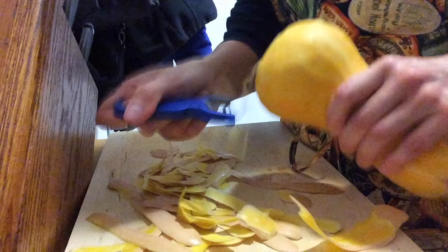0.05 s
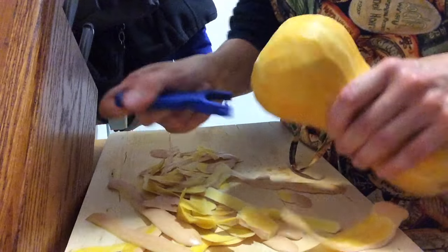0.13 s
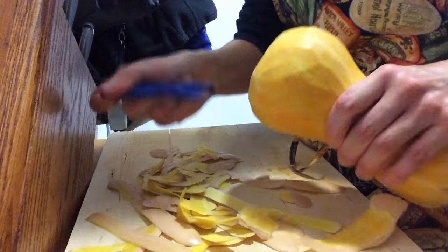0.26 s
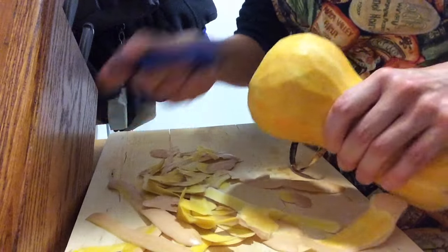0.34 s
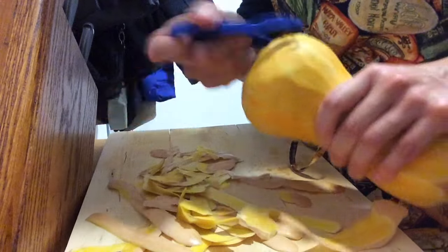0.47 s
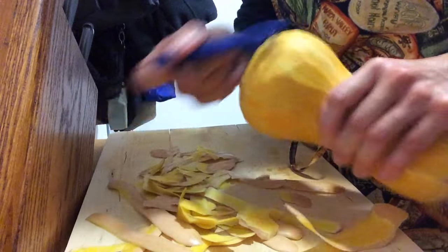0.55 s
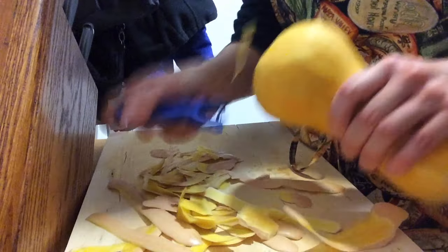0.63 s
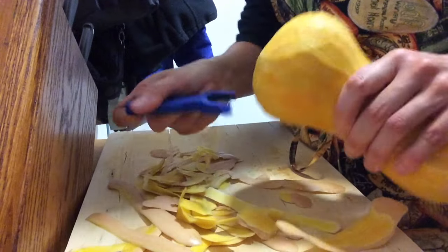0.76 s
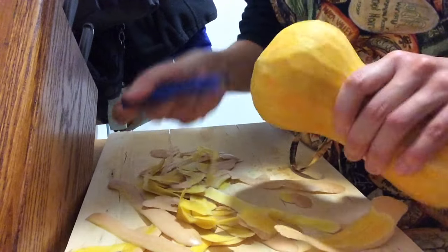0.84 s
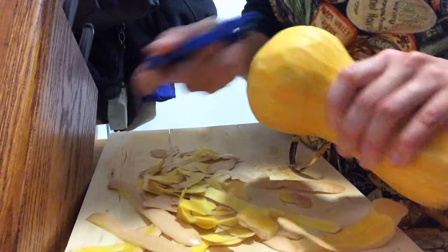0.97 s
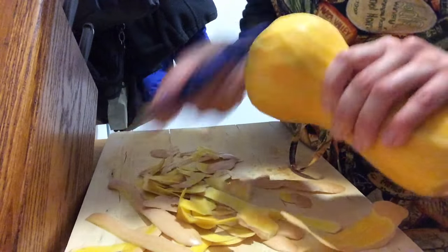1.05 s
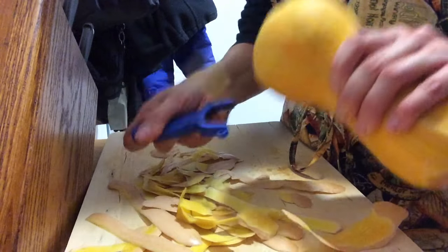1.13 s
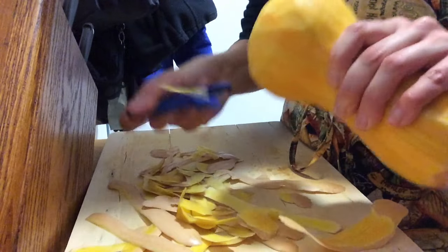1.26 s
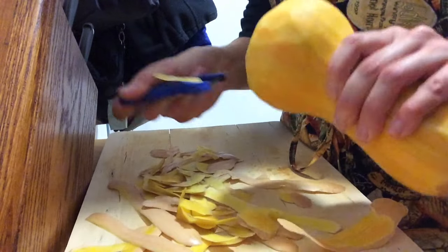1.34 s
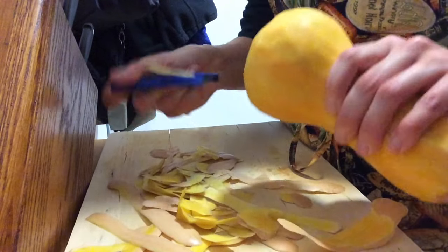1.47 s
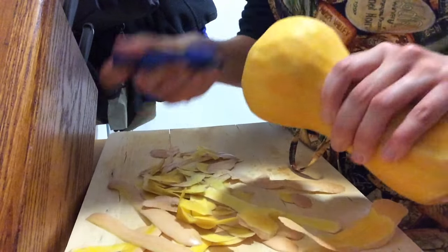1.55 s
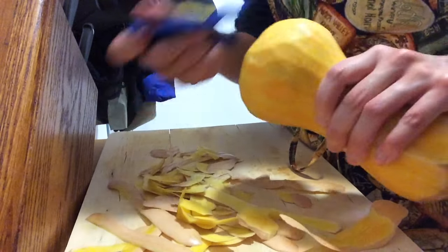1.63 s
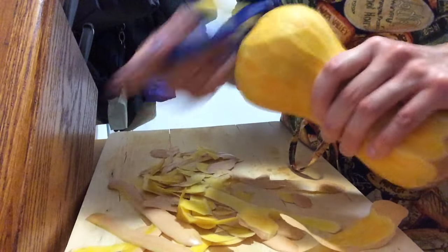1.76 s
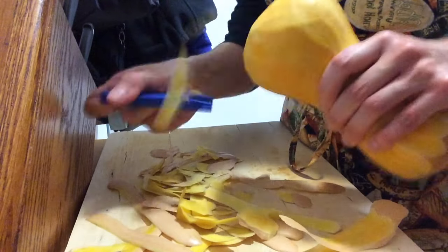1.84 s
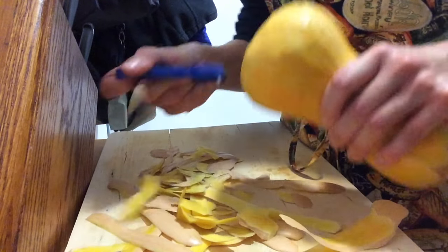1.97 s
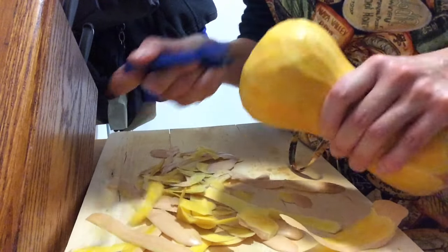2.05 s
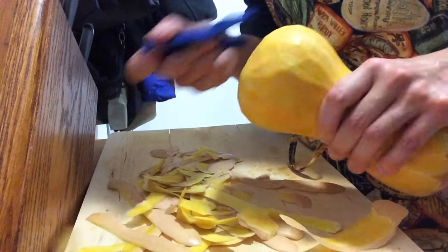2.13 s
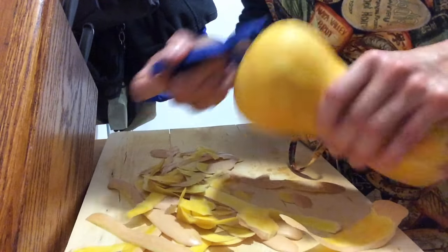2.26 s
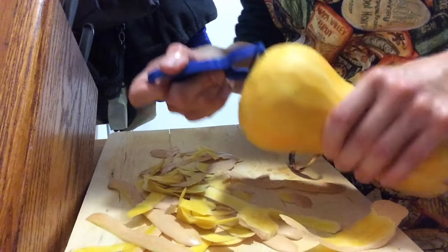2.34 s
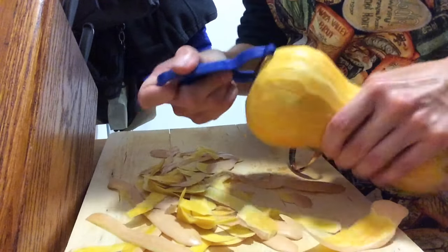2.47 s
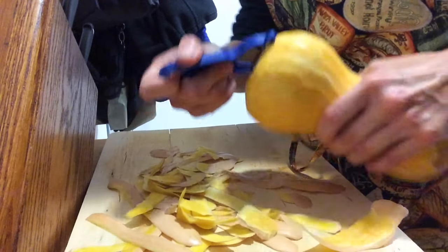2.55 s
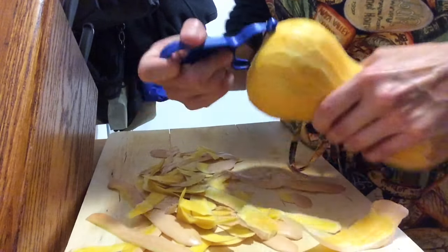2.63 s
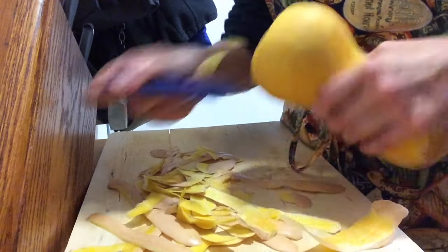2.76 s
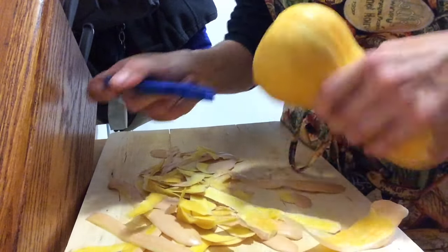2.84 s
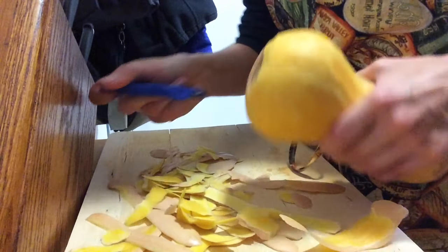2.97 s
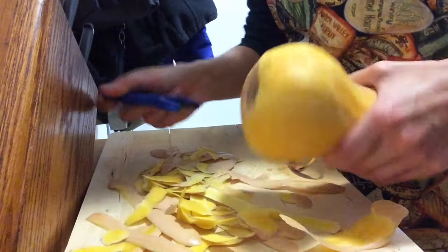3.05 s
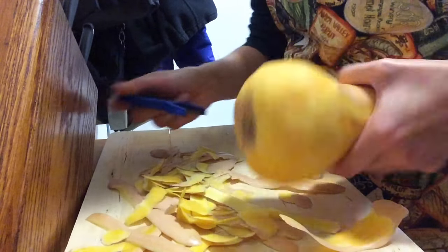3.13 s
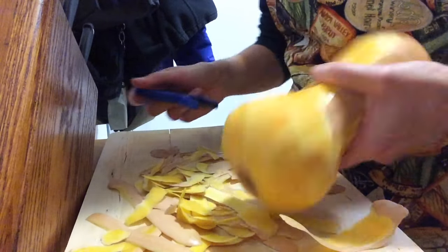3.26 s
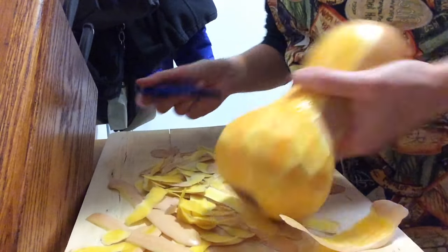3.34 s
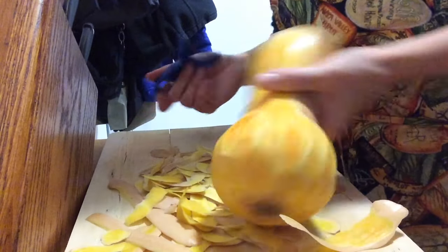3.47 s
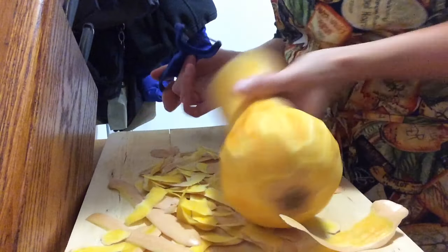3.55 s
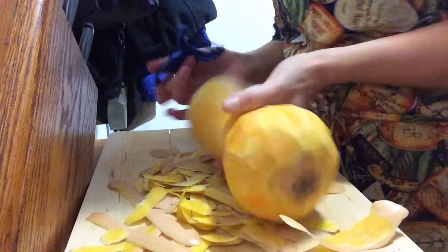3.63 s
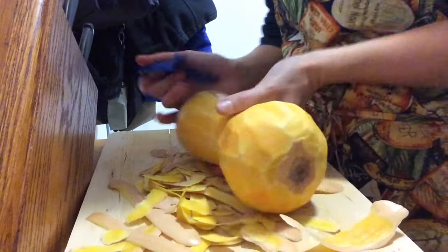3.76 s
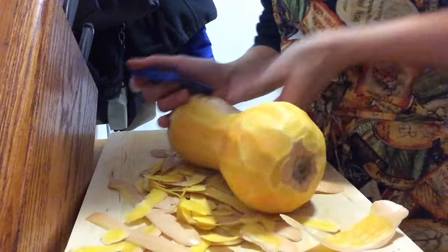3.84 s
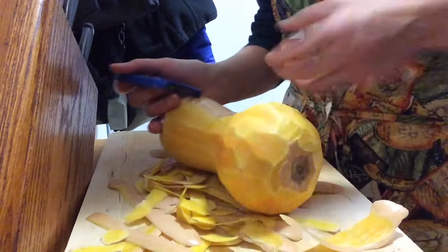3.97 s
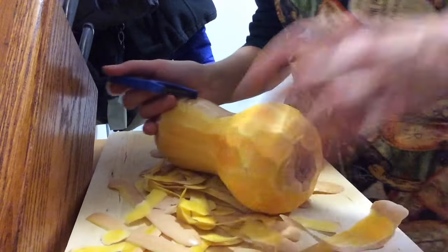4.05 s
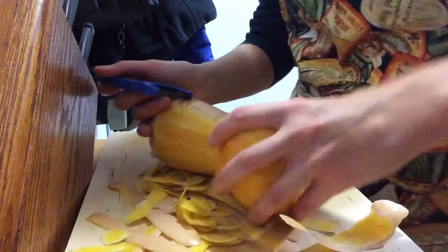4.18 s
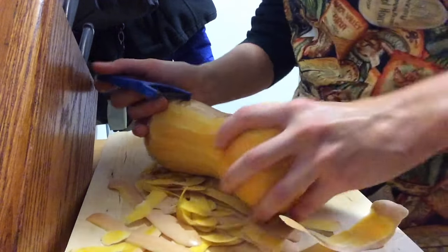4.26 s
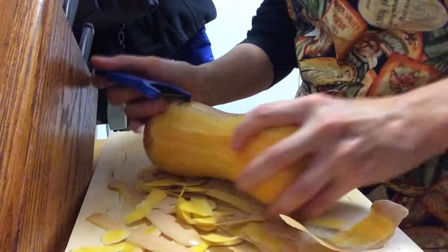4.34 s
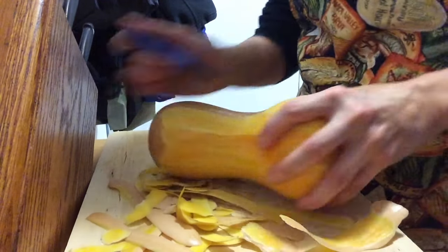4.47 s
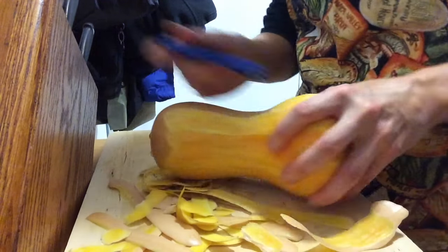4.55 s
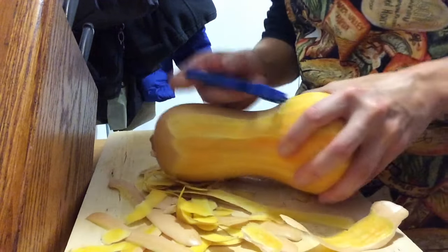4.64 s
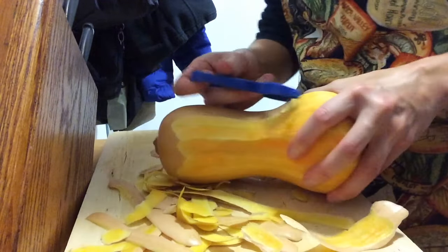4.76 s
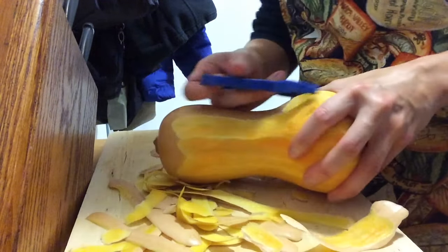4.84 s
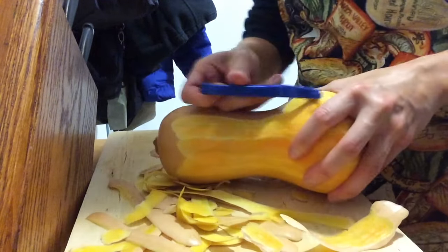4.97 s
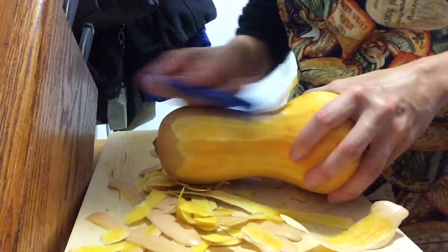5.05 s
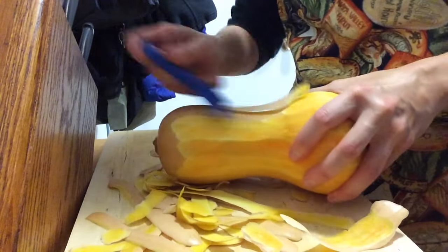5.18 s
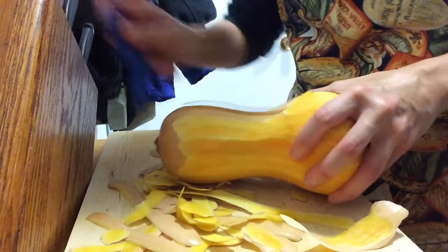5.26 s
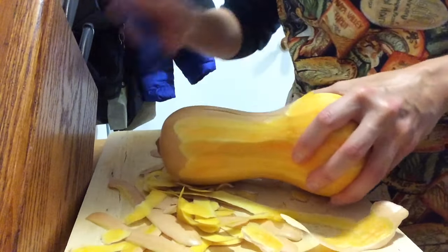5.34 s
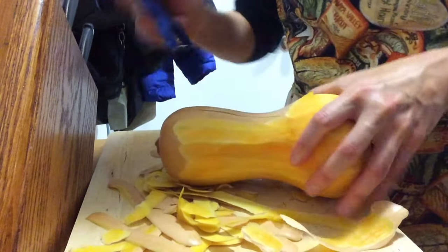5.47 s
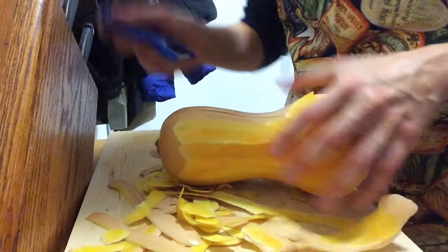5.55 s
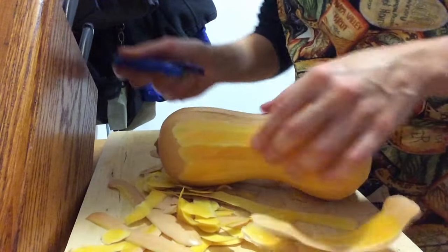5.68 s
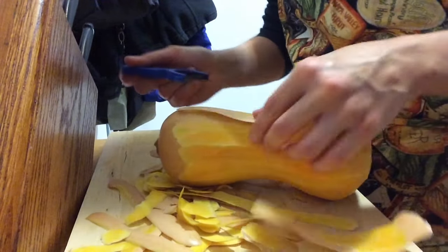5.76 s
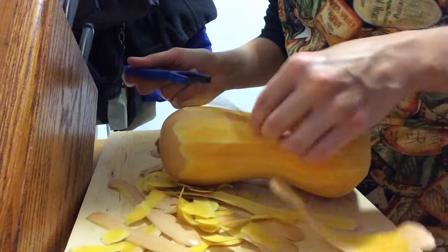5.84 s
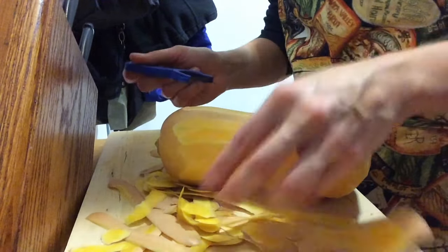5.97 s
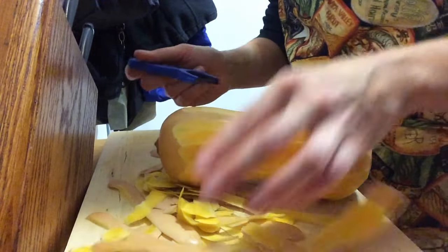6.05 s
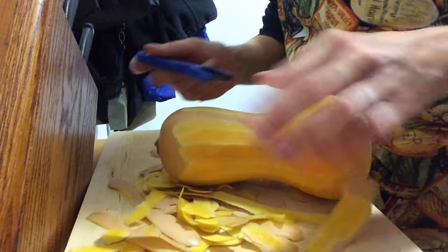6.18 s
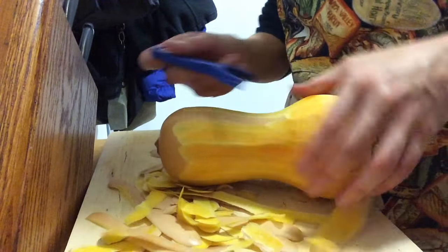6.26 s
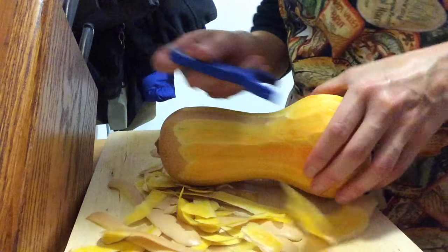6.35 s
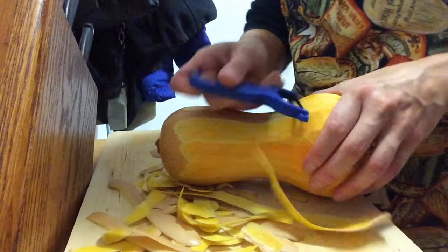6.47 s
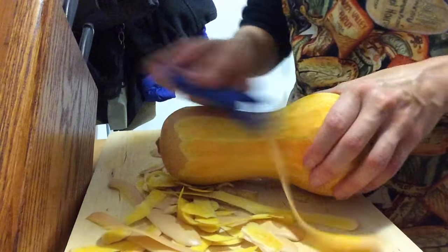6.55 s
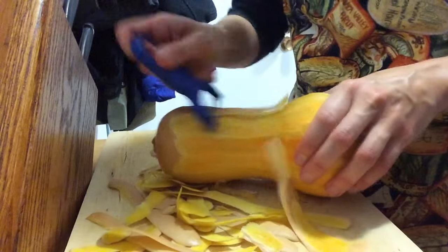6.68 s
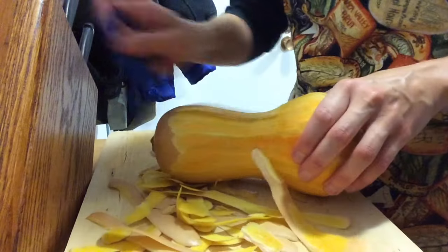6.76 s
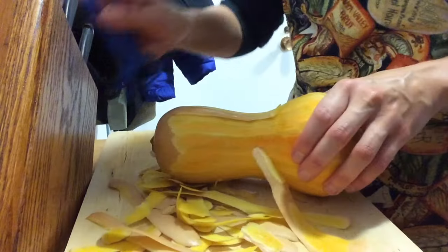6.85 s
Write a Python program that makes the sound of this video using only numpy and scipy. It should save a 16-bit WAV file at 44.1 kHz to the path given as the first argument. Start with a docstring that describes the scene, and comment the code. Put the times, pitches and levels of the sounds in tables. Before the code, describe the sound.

Close, crunchy peeling strokes with a loose blade clicking, a dull thud as the squash is set down on wood, then two longer smoother scrapes.

```python
"""In a quiet kitchen, close by, a swivel peeler strips a butternut squash over a cutting board, in mono.
The loose blade clacks on its stops (noise bursts through resonances), crunches through the skin (random
tiny snaps shaking frame and blade) and snaps free, at times with a thin steel ring (a decaying sine).
After six quick strokes the squash is set down with a soft knock (decaying modes), and two longer strokes
follow. Hands rustle; a low rumble, a trace of hum and a short room response surround it all."""
import sys
import numpy as np
from scipy import signal
from scipy.fft import rfft, irfft, next_fast_len
from scipy.io import wavfile
from scipy.ndimage import map_coordinates

SR = 44100
rng = np.random.default_rng(int(sys.argv[2]) if len(sys.argv) > 2 else 0)


def digitize_waveform(pressure):
    """Quantize a signal to 16-bit integers and store it at the path in sys.argv[1].

    Rows of a 2-D input are taken as channels; values are limited to [-1, 1].
    """
    field = np.atleast_2d(pressure).T
    bounded = np.clip(field, -1, 1)
    quanta = np.round(bounded * 32767).astype(np.int16)
    wavfile.write(sys.argv[1], SR, quanta)


N = 304731
NOW = np.arange(N) / SR  # time of every sample (s)


def amp(db):
    """Decibels express an amplitude ratio logarithmically."""
    return 10 ** (np.asarray(db) / 20)


def unit(x):
    """Normalization to an RMS of one."""
    return x / np.sqrt(np.mean(x ** 2) + 1e-20)


def peak(x):
    """Normalization to a peak of one."""
    return x / np.max(np.abs(x))


def along(points, hz):
    """Interpolation of (Hz, value) points on a logarithmic frequency axis."""
    point_hz, values = np.transpose(points)
    return np.interp(np.log(hz + 1), np.log(point_hz + 1), values)


def wobble(rate):
    """Slow random modulation: a smooth curve through random knots, rate of them a second."""
    knots = rng.standard_normal(int(N * rate / SR) + 4)
    return map_coordinates(knots, [np.arange(N) * rate / SR])


def filtered(x, response):
    """Linear filtering: the spectrum is multiplied by a complex response of frequency."""
    size = next_fast_len(len(x) + SR // 4)
    hz = np.fft.rfftfreq(size, 1 / SR)
    return irfft(rfft(x, size) * response(hz), size)[:len(x)]


def coloured(x, spectrum):
    """Spectral shaping by (Hz, dB) points."""
    return filtered(x, lambda hz: amp(along(spectrum, hz)))


def resonate(x, modes):
    """Modal resonance: parallel damped oscillators (Hz, width Hz, dB) of alternating sign."""
    def response(f):
        total = 0
        for k, (centre, width, db) in enumerate(modes):
            damping = 1j * f * width
            total = total + (-1) ** k * amp(db) * damping / (centre * centre - f * f + damping)
        return total
    return filtered(x, response)


def add(track, s, sound):
    """Superposition: a sound joins the track at time s."""
    part = track[max(round(s * SR), 0):][:len(sound)]
    part += sound[:len(part)]


def fractures(rate, spread_db, clump_db, clump_rate):
    """Brittle fracture: random tiny snaps, rate a second, of uneven size that come in clumps."""
    snaps = (rng.random(N) < rate / SR) * rng.choice([-1, 1], N)
    return snaps * amp(spread_db * rng.standard_normal(N) + clump_db * wobble(clump_rate))


def contact_db(t, length, attack, release):
    """Contact envelope: 0 dB while it lasts, 20 dB lower per attack before it and per release after it."""
    return -20 * (np.maximum(-t, 0) / attack + np.maximum(t - length, 0) / release)


# Background spectrum of the room. Each row: frequency in Hz, gain in dB.
ROOM_SPECTRUM = [(20, -25), (45, -10.5), (70, -3), (110, 0), (170, -5.5), (265, -2), (400, -14.5),
                 (720, -18), (1000, -21), (1400, -26.5), (2500, -33), (4500, -40), (6500, -38),
                 (9500, -43.5), (15000, -42.5)]


def room_tone(hum_hz=120, hum_db=-77, rumble_db=-63.07):
    """Ambient noise: random noise weighted to low frequencies, plus a trace of mains hum."""
    hum = amp(hum_db) * np.sin(2 * np.pi * hum_hz * NOW)
    rumble = unit(coloured(rng.standard_normal(N), ROOM_SPECTRUM))
    return amp(rumble_db + 0.6 * wobble(5.5)) * rumble + hum


# Hands and peel slide on squash and board. Each row: start in seconds, length in seconds,
# level at the start in dB, before random wavering.
SLIDES = [(0, 0.015, -59), (0.164, 0.062, -85), (2.504, 0.12, -72), (3.451, 0.22, -74.5),
          (3.7, 0.11, -74.5), (3.846, 0.064, -66), (4.217, 0.023, -69.5), (4.347, 0.17, -71.5),
          (4.626, 0.054, -68.5), (4.875, 0.065, -71), (5.791, 0.034, -70), (5.915, 0.023, -70),
          (5.987, 0.033, -81), (6.13, 0.058, -79.5), (6.349, 0.084, -73)]
# Colour of the rubbing. Each row: frequency in Hz, gain in dB.
RUB_SPECTRUM = [(200, -7.5), (1000, -0.5), (1500, 0.5), (2600, -5), (5000, -6), (7500, -8.5),
                (10000, -13.5), (15000, -15)]
RUB_RISE_S, RUB_FADE_S = 0.04, 0.1  # time for 20 dB in and out
RUB_SAG_DB = 3.5  # loss along one slide
GRIP_DB = -84.5  # the hands are never quite still


def handling():
    """Stick-slip friction: fingers and moist peel rub with a faint rustle that catches and lets go."""
    slides = np.zeros(N)
    for s, length, db in SLIDES:
        sag = RUB_SAG_DB * np.clip((NOW - s) / length, 0, 1)
        slides += amp(db + contact_db(NOW - s, length, RUB_RISE_S, RUB_FADE_S) - sag)
    grains = fractures(rate=2800, spread_db=3.5, clump_db=2.37, clump_rate=90)
    rub = unit(coloured(grains, RUB_SPECTRUM))
    return (slides + amp(GRIP_DB)) * amp(0.46 * wobble(22)) * rub


# The loose blade hits its stops. Each row: time in seconds, crack level in dB before a common trim,
# ping level in dB over the crack, handle clack level in dB over the crack.
CLICKS = [(0.0034, -47.5, 2, 8.5), (0.0598, -32, -5, 2.5), (0.064, -41, 0, 10), (0.0875, -35, 1, -7),
          (0.1988, -56, -4.5, -9), (0.238, -57, -2, -5.5), (0.5444, -29, 1, -0.5), (0.6734, -33, 4.5, -5.5),
          (0.8485, -76, 1, 5.5), (1.0854, -33, 5, 1.5), (1.16, -32.5, -1, -10), (1.7831, -39.5, 4, 6.5),
          (1.8656, -38.5, 1.5, -5.5), (1.8826, -37, -1, -14.5), (2.026, -67.5, -4, 1),
          (2.148, -78, 1, 12.5), (2.185, -79.5, 4.5, 10), (2.2554, -61, 5, 4.5), (2.2669, -44, 0.5, 8),
          (2.7889, -42, -4, -3), (2.7999, -36, -6, -9), (2.958, -57.5, -0.5, -5.5), (3.1007, -67.5, 4.5, 0),
          (3.8925, -72, 4.5, 14.5), (4.2203, -68, -5, -1), (4.7044, -36.5, 4, -8.5), (4.8592, -52, 4.5, 1),
          (5.3114, -37.5, -5, -6), (6.1225, -66.5, -3.5, -5), (6.508, -35, 6.5, -3),
          (6.8157, -52.5, 10, 3.5), (6.82, -49, 9, -6)]
# Colour of the crack. Each row: frequency in Hz, gain in dB.
CRACK_SPECTRUM = [(300, -28.5), (2400, -18), (4000, -1.5), (5200, -3.5), (7500, -11), (9000, -7),
                  (10200, -2.5), (11500, -6.5), (12600, 5.5), (13500, -3), (14300, 1), (15500, -7.5)]
# Plastic handle when struck. Each row: resonance in Hz, width in Hz, level in dB.
HANDLE_MODES = [(420, 170, -7), (1100, 590, -2), (1650, 230, -0.5), (2800, 430, -0.5)]
PING_FREE_HZ, PING_LOADED_HZ = 7297, 6550  # the steel pings lower with a strip of peel on it


def clicks(trim_db=-12.5):
    """Impact excitation: the swivel chatters on its stop for milliseconds; steel pings, the handle clacks."""
    out, t = np.zeros(N), np.arange(SR // 20) / SR
    envelope = (1 - np.exp(-t / 0.0012)) ** 2 * amp(-60 * t / 0.0097)
    for s, db, ping_db, clack_db in CLICKS:
        ping_hz = PING_LOADED_HZ if loaded(s) else PING_FREE_HZ
        chatter = rng.choice([-1, 1], (3, len(t))) * envelope
        ping = unit(resonate(chatter[0], [(ping_hz, 620, 0)]))
        crack = unit(coloured(chatter[1], CRACK_SPECTRUM))
        clack = unit(resonate(chatter[2], HANDLE_MODES))
        add(out, s, amp(db + trim_db) * (crack + amp(ping_db) * ping + amp(clack_db) * clack))
    return out


CLING_S = 0.02  # the strip stays on the blade this long after a cut


def loaded(s):
    """Mass loading: true from the deepest bite until just after a cut, while peel lies on the blade."""
    return any(start + rise < s < start + rise + fall + CLING_S for start, rise, fall, *_ in CUTS)


# Strokes of the edge through the skin, with faint touches and brushes of the blade between them.
# Each row: start in seconds, time to the deepest bite in seconds, time from there to the end in seconds,
# crunch level at the deepest bite in dB, swell before it in dB, sag after it in dB,
# blade resonance in dB over the crunch, tearing hiss in dB over the crunch;
# the levels hold before the mix in rasp().
CUTS = [(0.026, 0.036, 0.028, -37.5, 16.5, 12, -5.5, 2.5), (0.546, 0.056, 0.037, -54, 1, 5.5, -3, -1.5),
        (0.622, 0.029, 0.031, -35.5, 14.5, 12.5, 4, -2.5), (1.066, 0.01393, 0.00402, -70, 9.5, 1.5, -4, 6),
        (1.089, 0.048, 0.025, -41, 10, 3, 9.5, 2), (1.76, 0.011, .006, -60.5, 1, 5, -6.5, 0),
        (1.786, 0.056, 0.027, -40.5, 13.5, 1.5, -11.5, -0.5), (2.271, 0.023, 0.025, -49, 4, 3.5, 1, -3),
        (2.645, .043, 0.046, -61, 7, 11, -1.5, -1.5), (2.78, .006, 0.016, -39, 1.5, 5.5, 2, 1),
        (2.806, 0.019, 0.0081, -56.5, 3, 0, -4, 4.5), (4.742, 0.011, 0.0053, -64, 3, 0, 2, 3.5),
        (4.988, .017, .012, -57, 9.5, 14, -9, -6.5), (5.043, 0.0044, 0.0099, -49.5, 1, 3, 3, -3.5),
        (5.067, 0.037, 0.082, -37, 10, 17, 4.5, -2), (5.236, 0.05, 0.032, -48, 5.5, 1.5, 3, 2.5),
        (6.562, 0.06, 0.098, -42, 11.5, 19.5, 5, 1), (6.743, 0.062, 0.021, -51, 7, -2, 7, 5.5)]
BITE_S, FREE_S = 0.007, 0.008  # the edge enters and leaves the skin: time for a change of 20 dB
SAG_CURVE = 1.3  # the hand holds its pressure a while, then eases off ever faster
RING_AT, RING_FADE_DB = 0.6, 17.5  # share of a cut where the blade sings most; loss per squared share away
HISS_GROWS_DB = 3  # from start to end of a cut, as the strip lengthens
SHALLOW_HISS = 0.13  # dB of extra hiss for each dB that the bite is lighter


def cut_controls():
    """Force-dependent excitation: crunch, blade and hiss swell to the deepest bite, then sag until free."""
    gains = np.zeros((3, N))
    for start, rise, fall, db, swell_db, sag_db, blade_db, hiss_db in CUTS:
        length = rise + fall
        first = max(round(start * SR) - SR // 20, 0)
        span = slice(first, round((start + length) * SR) + SR // 10)
        t = NOW[span] - start
        progress = np.clip(t / length, 0, 1)
        before_db = swell_db * np.clip(1 - t / rise, 0, 1)
        after_db = sag_db * np.clip((t - rise) / fall, 0, 1) ** SAG_CURVE
        lighter_db = before_db + after_db
        crunch = db - lighter_db + contact_db(t, length, BITE_S, FREE_S)
        blade = crunch + blade_db - RING_FADE_DB * (progress - RING_AT) ** 2
        hiss = crunch + hiss_db + HISS_GROWS_DB * (progress - 0.5) + SHALLOW_HISS * lighter_db
        gains[:, span] = np.maximum(gains[:, span], amp([crunch, blade, hiss]))
    return gains


def rasp(cells, gains, frame_modes, blade_modes, tear, frame_db, ring_db, tear_db, fray_db):
    """Forced vibration: bursting cells shake frame and blade, and hiss as the strip frays and tears."""
    frame = unit(coloured(resonate(cells, frame_modes), [(3200, 3.0), (6000, -10)]))
    blade_band = [(1500, -14.5), (3200, -0.5), (4600, 0.5), (7000, -13)]
    blade = unit(coloured(resonate(cells, blade_modes), blade_band))
    hiss = unit(coloured(cells, tear) * amp(fray_db * wobble(130)))
    layers = [amp(frame_db) * frame, amp(ring_db) * blade, amp(tear_db) * hiss]
    return np.sum(gains * layers, axis=0)


# Peeler frame, then blade pressed into the flesh, each with the squash held in the air and resting on
# the board. Each row: resonance in Hz, width in Hz, level in dB.
FRAME_HELD = [(400, 300, -11.5), (1310, 560, -7), (1867, 420, -3.5), (2830, 300, 1)]
FRAME_RESTING = [(720, 210, -13.5), (1240, 266, -1.5), (1990, 200, -7.5), (2780, 260, -0.5)]
BLADE_HELD = [(3540, 400, -2.5), (4120, 440, -8.5)]
BLADE_RESTING = [(3490, 294, 2), (3960, 440, 0.5), (4550, 510, -11.5)]
# Colour of the tearing hiss, held and resting. Each row: frequency in Hz, gain in dB.
TEAR_HELD = [(300, -20.5), (2000, -21), (4200, -1.5), (4900, -4.5), (5900, 0.5), (7000, -4), (7800, 3),
             (8600, -7.5), (9800, -6), (11000, -7.5), (12700, -5), (15000, -7.5)]
TEAR_RESTING = [(300, -15), (2000, -8), (4200, -8), (4900, -4.5), (5900, 0), (6500, 0.5), (7300, -1),
                (7900, 1.5), (8700, -7.5), (9800, -5), (11000, -9.5), (12400, -6.5), (15000, -13)]
SET_DOWN = 3.67  # the squash rests on the board from here on (s)


def cutting():
    """Boundary conditions: held, strokes crunch unevenly; on the resting squash the edge runs smoother."""
    gains = cut_controls()
    quick = fractures(rate=10000, spread_db=4.0, clump_db=2.0, clump_rate=490)
    steady = fractures(rate=7000, spread_db=2.0, clump_db=1.66, clump_rate=350)
    held = rasp(quick, gains, FRAME_HELD, BLADE_HELD, TEAR_HELD,
                frame_db=-2.5, ring_db=-6.0, tear_db=-1.0, fray_db=0.7)
    resting = rasp(steady, gains, FRAME_RESTING, BLADE_RESTING, TEAR_RESTING,
                   frame_db=-3.0, ring_db=-1.0, tear_db=-0.56, fray_db=1.0)
    return np.where(NOW < SET_DOWN, held, resting)


# The freed blade is left ringing. Each row: start in seconds, initial level in dB.
TWANGS = [(.675, -59.5), (1.884, -45.5), (2.27, -61), (2.83, -65)]


def twangs(ring_hz=13280, t60=0.16):
    """Free vibration: with nothing to damp it, the thin steel rings on at one high mode."""
    out, t = np.zeros(N), np.arange(SR // 3) / SR
    for s, db in TWANGS:
        add(out, s, amp(db - 60 * t / t60) * np.sin(2 * np.pi * ring_hz * t))
    return out


# The squash meets the board. Each row: time in seconds, thud level in dB before a common trim and
# the dulling filter, slap level in dB relative to the thud before a common lift.
KNOCKS = [(3.67, -30.5, -17), (3.685, -34.5, -8.5), (3.897, -43, -17.5), (3.909, -37.5, -23),
          (3.939, -46, -18), (4.559, -45.5, -16.5), (5.425, -44.5, -24), (6.724, -49, -16),
          (6.773, -47.5, -16)]
# Squash on the board, before random scatter. Each row: mode in Hz, level in dB, t60 in seconds.
BOARD_MODES = [(92, -10, 0.11), (128.5, 2, 0.046), (180.5, -4, 0.081), (265, -6, 0.059), (363, -8, 0.057)]
# The board's slap. Each row: resonance in Hz, width in Hz, level in dB.
SLAP_MODES = [(460, 170, 2.5), (700, 76, 1), (917, 140, -0.5), (1340, 130, 0.5), (1740, 460, -8)]


def knocks(trim_db=-5.0, slap_lift_db=11):
    """Modal decay after impact: the heavy squash thuds and rocks on the board, its skin slapping the wood."""
    out, t = np.zeros(N), np.arange(SR // 4) / SR
    for s, db, slap_db in KNOCKS:
        thud = np.zeros(len(t))
        for hz, level, t60 in BOARD_MODES:
            decay = amp(level + rng.normal(0, 1.9) - 60 * t / t60)
            thud += decay * np.sin(2 * np.pi * hz * (1 + rng.normal(0, 0.079)) * t)
        thud = peak(thud * (1 - np.exp(-t / 0.0087)))  # soft onset
        slap = peak(resonate(rng.standard_normal(len(t)) * amp(-60 * t / 0.053), SLAP_MODES))
        add(out, s, amp(db + trim_db) * (thud + amp(slap_db + slap_lift_db) * slap))
    return coloured(out, [(2000, 1), (4000, -8), (10000, -15)])  # soft flesh dulls the contact


def glance(x, delay=0.0008985, sway=0.00018, share=0.3):
    """Comb filtering: a near reflection off the squash; its path (s) shifts with the hand, and so the colour."""
    path = np.arange(N) - SR * (delay + sway * wobble(5))
    return (x + share * map_coordinates(x, [path], order=3)) / np.hypot(1, share)


# Decay of the room. Each row: frequency in Hz, t60 in seconds.
KITCHEN_DECAY = [(200, 0.25), (2000, .25), (6000, 0.2), (15000, 0.092)]


def kitchen(x, near_db, near_t60, tail_db, count=3):
    """Reverberation: board and cupboard echoes and a short tail; random responses fade into one another."""
    shares = np.array([wobble(4) for _ in range(count)])
    out = np.zeros(N)
    for share in shares / np.linalg.norm(shares, axis=0):
        hz, t, noise = signal.stft(rng.standard_normal(SR // 2), SR, nperseg=256)
        decay = amp(-60 * t / along(KITCHEN_DECAY, hz)[:, None])
        tail = signal.istft(noise * decay, SR, nperseg=256)[1]
        t = np.arange(len(tail)) / SR
        sparse = rng.standard_normal(len(t)) * (rng.random(len(t)) < 0.03)
        near = sparse * amp(-60 * t / near_t60)
        answer = amp(near_db) * near / np.linalg.norm(near) + amp(tail_db) * tail / np.linalg.norm(tail)
        answer = np.pad(answer, (SR // 500, 0))  # starts 2 ms after the direct sound
        out += signal.fftconvolve(share * x, answer)[:N]
    return out


def scene():
    """Superposition of peeler, squash, hands and kitchen, alike in both channels."""
    close = glance(handling() + clicks() + cutting()) + twangs() + knocks()
    mono = room_tone() + close + kitchen(close, near_db=-14.0, near_t60=0.088, tail_db=-16.5)
    return np.array([mono, mono])


TOP_HZ = 15500  # upper band limit


def record(dry):
    """Band limitation: a very steep low-pass removes what lies above the top frequency."""
    def low_pass(hz):
        return 1 / np.sqrt(1 + (hz / TOP_HZ) ** 160)
    return np.array([filtered(side, low_pass) for side in dry])


dry = scene()
out = record(dry)
digitize_waveform(out)
```